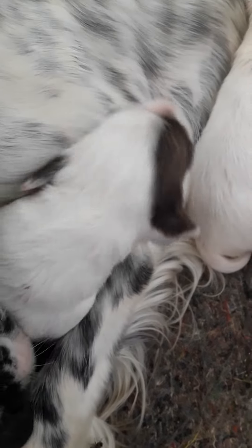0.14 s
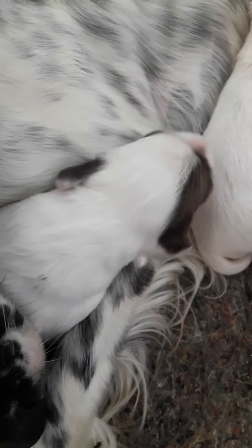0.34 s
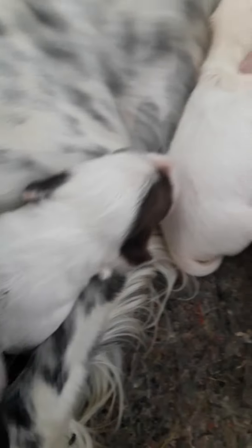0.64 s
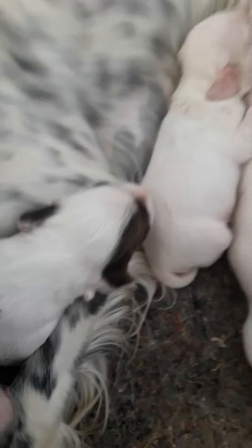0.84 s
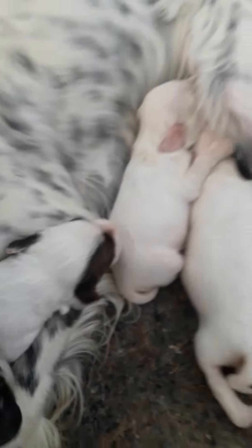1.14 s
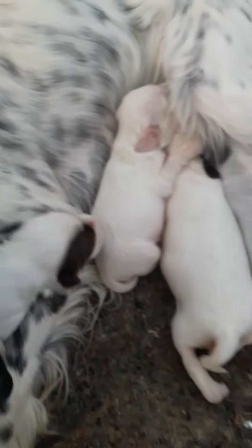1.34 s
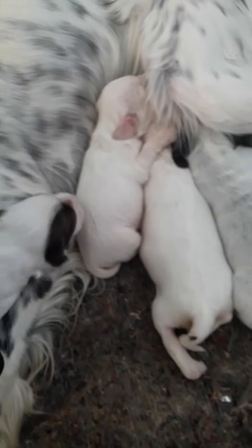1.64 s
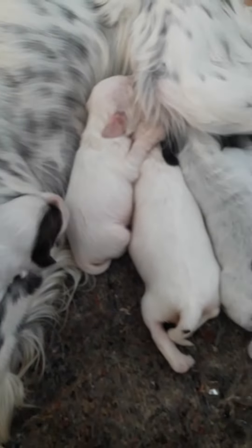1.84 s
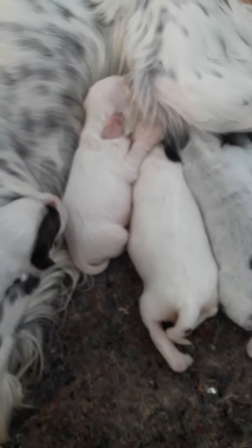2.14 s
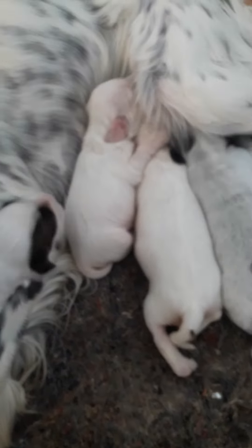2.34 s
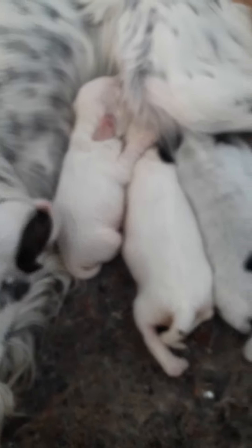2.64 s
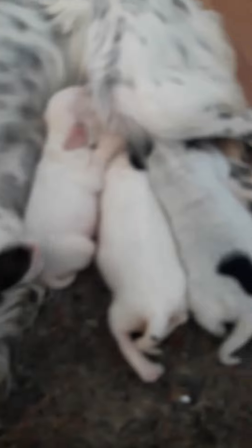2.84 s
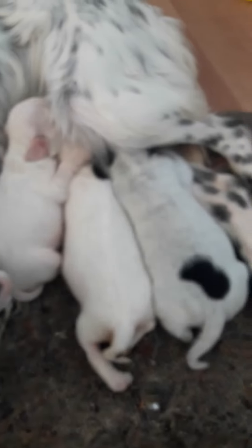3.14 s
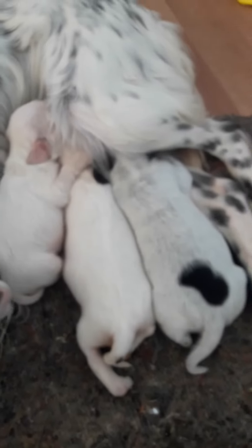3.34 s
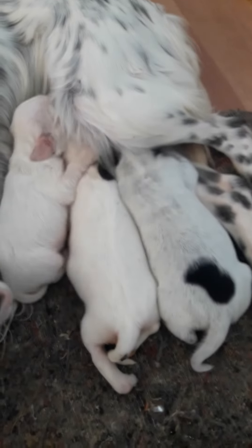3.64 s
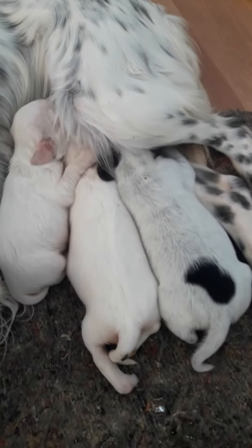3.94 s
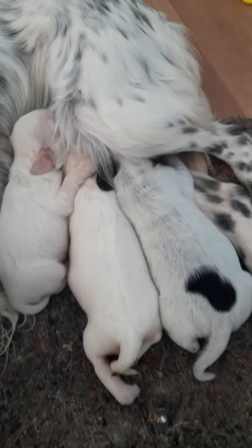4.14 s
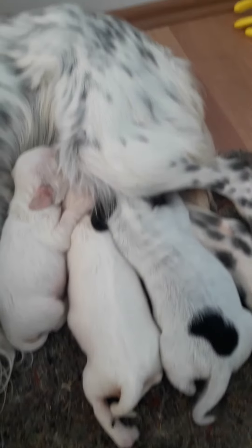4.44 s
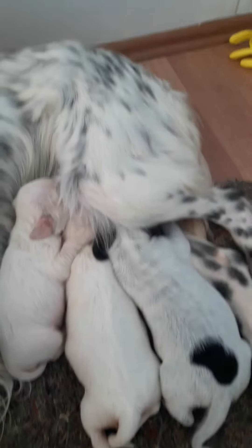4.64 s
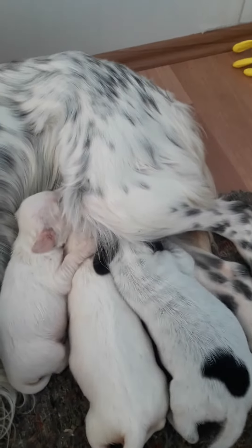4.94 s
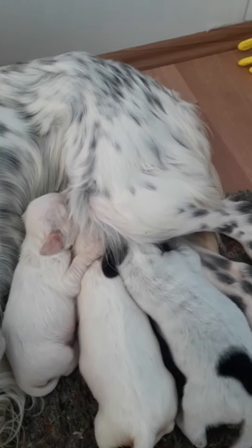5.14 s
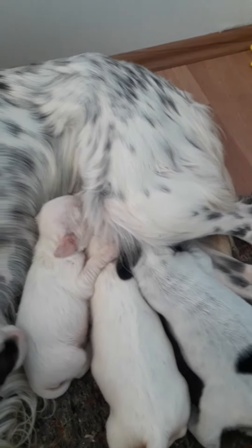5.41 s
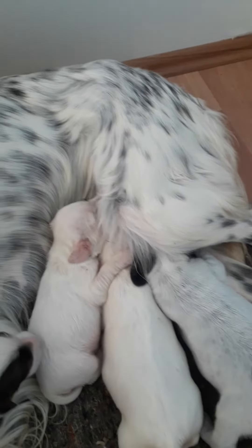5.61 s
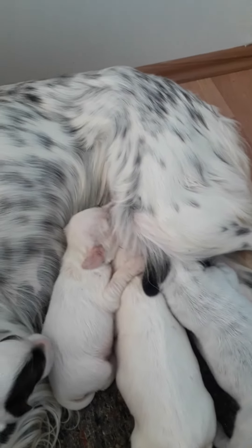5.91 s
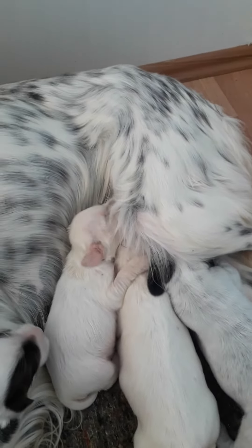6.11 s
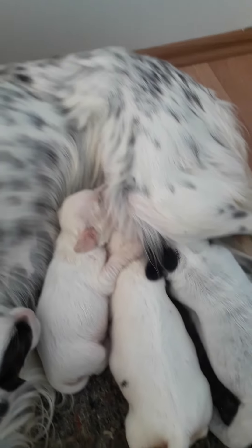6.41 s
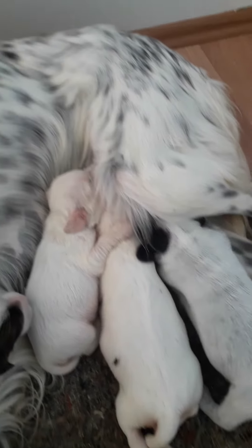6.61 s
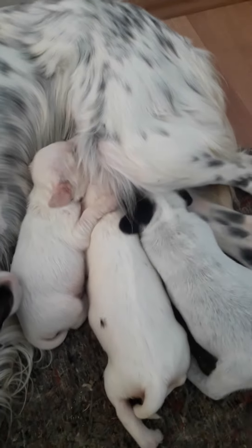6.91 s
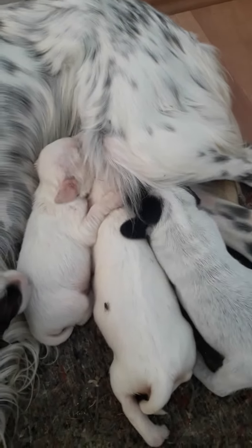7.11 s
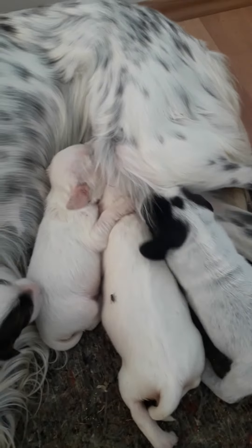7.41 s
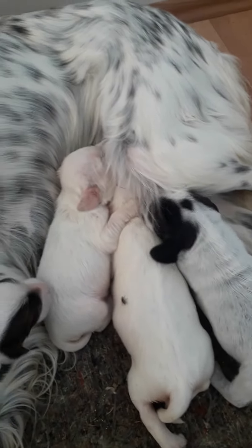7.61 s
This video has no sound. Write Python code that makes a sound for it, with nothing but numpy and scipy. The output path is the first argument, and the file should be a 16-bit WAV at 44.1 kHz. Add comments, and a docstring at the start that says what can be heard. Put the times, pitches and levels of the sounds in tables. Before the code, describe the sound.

Close up in a small room, nursing puppies let out short, nearly pure whines, with swallows, wet mouth clicks and thin sniffs in between. The squeaking stops a little past halfway, a dog snorts once, and the puppies grunt softly and keep suckling, with a cluster of smacks and gulps near the end. Light fur brushing, faint rustling on a rug and a quiet room hiss lie underneath.

```python
"""Newborn puppies nurse close by in a small room, squeaking in thin, nearly pure whines.
Slack vocal folds grunt, throats pop and hum as they gulp, and films of milk snap on their lips.
Air hisses through small noses, and one dog snorts with a flutter of the nostrils.
Fur brushes on fur now and then; under it all lie a faint rustle on the rug and a quiet room hiss."""
import sys
import numpy as np
from scipy import signal
from scipy.fft import rfft, irfft, next_fast_len
from scipy.io import wavfile
from scipy.ndimage import uniform_filter1d

SR = 44100
rng = np.random.default_rng(int(sys.argv[2]) if len(sys.argv) > 2 else 0)


def generate_wav(signal):
    """Clip the signal to [-1, 1] and save it as 16-bit WAV at the path in sys.argv[1]."""
    frames = np.transpose(np.atleast_2d(signal))
    scaled = np.clip(frames, -1, 1) * 32767
    pcm = np.round(scaled).astype(np.int16)
    wavfile.write(sys.argv[1], SR, pcm)


N = 342216

# throat colour of grunts and gulps: (frequency [Hz], gain [dB])
THROAT_EQ = [(60, -20), (170, 3.5), (350, 5.5), (550, -8), (850, -4.5), (1300, -7), (1700, -4.5), (2100, 0),
             (2600, -13), (4000, -53), (8000, -66.5)]
# nose resonances, also the colour of lip fizz and rug rustle: (frequency [Hz], gain [dB])
NOSE_EQ = [(200, -6.5), (900, 2), (1600, -4), (2300, 2.5), (3000, -4), (3800, 1.5), (4800, -1), (5800, 2.5),
           (8500, -26), (10500, -19), (15500, -22)]


def squeak(row, tune, swell_db=1.5, brighten_db=4.5, jitter=.005, flutter_db=2.6, rasp=.035):
    """A nearly pure whine: the folds chirp as they catch and let go; air whistles in the muzzle."""
    # colour of the upper harmonics and breath: (frequency [Hz], gain [dB])
    muzzle_eq = [(2500, -8), (3500, -12), (4500, -14), (5400, -25), (6100, 3), (6900, -7.5), (7700, -25),
                 (9400, -40), (10300, -17), (11500, -29.5), (12500, -27), (15500, -31.5)]
    # brief dips in the whine's fundamental, with its overtones swelling or fading:
    # (time [s], half width [s], fundamental change [dB], overtone change [dB])
    level_dips = [(.852, 0.018, -11.5, -15), (.98, 0.0089, -3.5, 0), (1.79, .012, -18.5, 5.5),
                  (1.91, 0.0097, -14, 2.5), (3.34, 0.022, -10, 1), (3.463, 0.024, -3, -5),
                  (4.288, 0.016, -3.5, 2.5), (4.482, 0.02, -3, 11.5)]
    s, length, rise, level_db, second_db, third_db, whistle_db, open_db, close_db, hoarse = row
    t, u = span(length)
    n = len(t)
    hz = np.interp(s + t, *np.transpose(tune))
    phase = 2 * np.pi * np.cumsum(hz * (1 + jitter * wander(n, 300))) / SR
    body_db, bright_db = sum(np.outer(db, bump(s + t, at, width)) for at, width, *db in level_dips)
    bright_db += brighten_db * (u - .5)
    body = gain_of(level_db + swell_db * (u - .5) + body_db) * held(t, rise, fall=.019)
    opening = bump(t, at=.0081, width=.0031)
    closing = bump(t, at=length - .013, width=.0086)
    chirps = gain_of(open_db) * opening + gain_of(close_db) * closing
    breath = (1 + np.cos(phase)) * above(rng.standard_normal(n), 2000)
    upper = gain_of(whistle_db - 8) * evened(coloured(breath, muzzle_eq))
    for k in range(2, 20):
        if k <= 3:
            partial_db = (second_db if k == 2 else third_db) + bright_db
        else:
            partial_db = whistle_db + read(muzzle_eq, k * hz) - 1
        partial_db += flutter_db * wander(n, 87) * (1 - 1 / k) ** 2
        upper -= gain_of(partial_db) * np.cos(k * phase + hoarse * wander(n, 110))
    upper *= held(t, rise=.017, fall=.0042)
    upper *= 1 - .87 * (opening + closing)  # overtones duck under the chirps
    tone = (body + chirps) * np.cos(phase) + upper
    tone *= 1 + rasp * wander(n, 460)  # cycles of uneven strength
    return s, faded(tone * gain_of(wander(n, 68)))  # 1 dB of shimmer


def grunt(s, length, rise, fall, level_db, start_hz, end_hz, open_hz, shut_after, alternation, rough,
          shut_hz=240, shutting_s=.0061, mouth_width_hz=620, leak=.18, jitter=.02, muffle_db=-.5):
    """Slack folds beat strong and weak by turns; the mouth resonance sinks as the lips close."""
    t, u = span(length)
    hz = end_hz + (start_hz - end_hz) * (1 - u) ** 1.623  # glides fastest at first
    shut = (1 + np.tanh((t - shut_after) / shutting_s)) / 2
    mouth_hz = open_hz + (shut_hz - open_hz) * shut
    slack = (1 + 4 * rough) * np.sqrt(400 / hz)  # slow beats are the most uneven
    phase = 2 * np.pi * np.cumsum(hz * (1 + jitter * slack * wander(len(t), 130))) / SR
    folds = sum((np.cos(k * phase) + alternation * np.cos((k - .5) * phase)) * (k * hz < 3000)
                for k in range(1, 36))
    puffs = (1 + np.cos(phase) / 2) * rng.standard_normal(len(t))
    drive = (1 - rough) * evened(coloured(folds, THROAT_EQ))
    drive += rough * evened(coloured(puffs, THROAT_EQ))
    voice = resonate(resonate(drive, mouth_hz, mouth_width_hz), mouth_hz, mouth_width_hz)
    voice = above(voice + leak * drive, max(180, .97 * hz.min()))
    voice /= np.sqrt(uniform_filter1d(voice ** 2, size=800) + 1e-12)  # flatten the level
    return s, voice * gain_of(level_db + muffle_db * shut) * held(t, rise, fall)


def gulp(s, pop_db, hum_db, hz, length, sag=.398, pop_hz=850, pop_t60=.012, pop_rise_s=.00094,
         rasp=.3, overtone=.35):
    """The throat pops open, then hums for a few cycles at a falling pitch."""
    side_modes = ring(pop_hz * 1.326, pop_t60) + ring(pop_hz * .772, pop_t60)
    pop = ring(pop_hz, pop_t60) + side_modes / 2
    t = np.arange(len(pop)) / SR
    sound = gain_of(pop_db) * pop * (1 - np.exp(-t / pop_rise_s))
    u = np.linspace(0, 1, min(int(length * SR), len(sound)))
    phase = 2 * np.pi * np.cumsum(hz * (1 - sag * u)) / SR
    hum = np.sin(phase) + overtone * np.sin(2 * phase) + overtone / 2 * np.sin(3 * phase)
    hum += rasp * evened(coloured(rng.standard_normal(len(u)), THROAT_EQ))
    add(sound, 0, gain_of(hum_db) * hum * np.sin(np.pi * u))
    return s, above(sound, 150)


def smack(s, peak_db, hz, t60, spit=.42, spit_t60=.021, dull_db=3.5):
    """A film of milk snaps and rings the small mouth cavity, with a brief fizz."""
    # mouth modes: (pitch [x cavity pitch], level [dB], ring time [x t60])
    modes = [(.89, 2, 0.86), (1.1, 6, 0.72), (1.63, -5, 2.16), (2.47, -7, 0.69), (2.95, -31.5, 0.37)]
    tilt_db = -dull_db * np.log2(t60 / .0065)  # slow smacks are dull, quick ones bright
    cavity = sum(gain_of(db + k * tilt_db) * ring(hz * ratio, t60 * longer) * (-1) ** k
                 for k, (ratio, db, longer) in enumerate(modes))
    t = np.arange(len(cavity)) / SR
    fizz = evened(coloured(rng.standard_normal(len(t)), NOSE_EQ)) * gain_of(-60 * t / spit_t60)
    sound = above(cavity + spit * fizz, .99 * hz)
    return s, gain_of(peak_db) * sound / abs(sound).max()


def snort(s=5.16, flaps=6, gap_s=.0047, slowing=.095, uneven=.097, rise_s=.0092, fade_db_per_s=478):
    """The nostrils flap, slow down and settle, ringing the nose over a rush of air and a low thump."""
    # nose modes: (frequency [Hz], level [dB], t60 [s])
    modes = [(225, -16, 0.053), (350, -18.5, 0.027), (808, -33.5, 0.046), (1500, -17, 0.027),
             (1700, -29, 0.024), (2710, -26, 0.043), (3570, -55, .03), (7400, -51, 0.035),
             (10300, -44.5, 0.047)]
    nose = sum(gain_of(db) * ring(hz, t60) for hz, db, t60 in modes)
    out = np.zeros(N)
    for k in range(flaps):
        after = gap_s * (k + slowing * k ** 2 + uneven * rng.standard_normal())
        attack = min(1, (k + .5) * gap_s / rise_s)
        add(out, s + after, attack * gain_of(1 - fade_db_per_s * after) * nose)
    add(out, s, air_rush())
    out = above(out, 214)
    add(out, s, gain_of(-45) * ring(hz=95, t60=.28))  # thump
    return out


def air_rush(hold_s=.48, flutter_db=1.25):
    """The snort's air surges, settles and runs out, in a hollow layer and a thin, high one."""
    # colour of the air: (frequency [Hz], gain [dB])
    rush_eq = [(100, -18), (300, -3.5), (650, -12), (1100, -11.5), (1450, 2), (2300, -1.5), (2800, 1),
               (3200, -4.5), (3800, 4.5), (5400, -1), (6600, -9.5), (7400, -7.5), (8500, -21.5),
               (10500, -11), (15500, -14)]
    t, _ = span(1)

    def flow(level_db, rise, surge_db, surge_s, fade_db_per_s):
        db = level_db + surge_db * np.exp(-t / surge_s) - fade_db_per_s * np.maximum(t - hold_s, 0)
        return np.minimum(t / rise, 1) * gain_of(db)

    hollow, thin = (coloured(noise, rush_eq) for noise in rng.standard_normal((2, len(t))))
    hollow = evened(signal.sosfilt(signal.butter(2, 4500, fs=SR, output="sos"), hollow))
    thin = evened(above(thin, 7000))
    hollow *= flow(-49, rise=.28, surge_db=27.5, surge_s=.1266, fade_db_per_s=41)
    thin *= flow(-51.5, rise=.17, surge_db=34, surge_s=.0477, fade_db_per_s=115)
    return (hollow + thin) * gain_of(flutter_db * wander(len(t), 80))


def sniff(s, length, rise, fall, level_db, start_hz, end_hz, width_hz=520, leak=.055, flutter_db=2):
    """Air hisses through a narrow nostril whose two resonances drift together."""
    t, u = span(length)
    hz = start_hz + (end_hz - start_hz) * u
    low_noise, high_noise, broadband = rng.standard_normal((3, len(t)))
    lower = resonate(low_noise, hz, width_hz * np.mean(hz) / 3000)
    upper = gain_of(-7) * resonate(high_noise, 1.1 * hz, width_hz)
    air = evened(coloured(lower + upper + leak * broadband, NOSE_EQ))
    return s, air * held(t, rise, fall) * gain_of(level_db + flutter_db * wander(len(t), 78))


def fur_brush(s, length, level_db, flicks_per_s=2500):
    """Hairs flick past each other in one stroke: a soft, high crackle."""
    # colour of the fur: (frequency [Hz], gain [dB])
    fur_eq = [(1500, -26), (4000, 3), (6000, -4), (8500, -22.5), (10500, -7), (15500, -1)]
    t, u = span(length)
    flicks = (rng.random(len(t)) < flicks_per_s / SR) * rng.standard_normal(len(t))
    return s, gain_of(level_db) * np.sin(np.pi * u) * evened(coloured(flicks, fur_eq))


def rug_rustle(ticks_per_s=90, level_db=-73):
    """Fur and paws brush the rug in tiny scattered ticks."""
    ticks = rng.random(N) < ticks_per_s / SR
    strength = gain_of(3.5 * np.minimum(rng.exponential(1, N), 2.5))
    grain = rng.standard_normal(600) * signal.windows.hann(600)
    rustle = signal.oaconvolve(ticks * strength, grain)[:N]
    return gain_of(level_db) * evened(coloured(rustle, NOSE_EQ))


def room_hiss(level_db=-59, swell_db=1.25):
    """A gently wavering bed of hiss, almost the same in both ears."""
    # colour of the hiss: (frequency [Hz], gain [dB])
    hiss_eq = [(20, -34.5), (55, 5.5), (110, 7.5), (170, 0), (400, -4.5), (1500, -9), (2500, -10),
               (4200, -4.5), (5400, 2.5), (6500, -11.5), (7600, -23), (8800, -30), (10500, -17.5),
               (15500, -12.5)]
    # stereo image: (frequency [Hz], left-right likeness [0-1])
    likeness = [(50, 0.96), (4000, 0.95), (8000, 0.99), (14000, 0.51)]
    middle, side = (coloured(rng.standard_normal(N), hiss_eq) for _ in range(2))
    side_eq = [(hz, 10 * np.log10(max(1 - same, 1e-3) / (1 + same))) for hz, same in likeness]
    side = coloured(side, side_eq) / np.std(middle)
    return gain_of(level_db + swell_db * wander(N, 5.4)) * (evened(middle) + np.array([side, -side]))


def room(x, wet_db, overtones_db=0, width=.0067, echoes_per_s=2500):
    """A small room: sparse reflections of random sign, each band dying at its own speed."""
    # reverb decay: (frequency [Hz], t60 [s])
    decay = [(200, 0.3), (800, 0.32), (2000, 0.44), (5000, 0.2), (12000, 0.022)]
    size = SR // 2
    taps = rng.choice([-1, 1], (2, size)) * (rng.random((2, size)) < echoes_per_s / SR)
    taps *= np.arange(size) > SR // 200  # 5 ms pre-delay
    hz, t, bands = signal.stft(taps, SR, nperseg=256)
    tail = signal.istft(bands * gain_of(-60 * t / read(decay, hz)[:, None]), SR, nperseg=256)[1]
    send = coloured(x, [(1000, .0035), (1400, overtones_db)])
    middle, side = signal.fftconvolve(send[None], tail / np.linalg.norm(tail[0]), axes=1)[:, :N]
    return x + gain_of(wet_db) * (middle + width * np.array([side, -side]))


def gain_of(db):
    """Decibels to amplitude."""
    return 10 ** (np.asarray(db) / 20)


def evened(x):
    """Scales to rms 1."""
    return x / np.sqrt(np.mean(x ** 2) + 1e-20)


def read(points, hz):
    """Reads a table on a log-frequency axis."""
    f, value = np.transpose(points)
    return np.interp(np.log(hz + 1), np.log(f + 1), value)


def add(mix, s, sound):
    """Adds a sound into the mix at time s."""
    part = mix[round(s * SR):][:len(sound)]
    part += sound[:len(part)]


def coloured(x, points):
    """Applies an EQ curve in dB."""
    size = next_fast_len(len(x) + 2048)
    gain = gain_of(read(points, np.fft.rfftfreq(size, 1 / SR)))
    return irfft(rfft(x, size) * gain, size)[:len(x)]


def above(x, hz):
    """A steep high-pass."""
    return signal.sosfilt(signal.butter(4, min(hz, SR / 4), "high", fs=SR, output="sos"), x)


def wander(size, hz):
    """Smooth random motion of rms about 1, up to about hz."""
    whole = next_fast_len(size + SR // 8)
    f = np.fft.rfftfreq(whole, 1 / SR)
    return evened(irfft(rfft(rng.standard_normal(whole)) * np.exp(-(f / hz) ** 2)))[:size]


def resonate(x, hz, width_hz):
    """A resonance of gain 1 that follows the curve hz."""
    turn = np.exp(2j * np.pi * np.cumsum(hz) / SR)
    pole = np.exp(-np.pi * width_hz / SR)
    return 2 * (turn * signal.lfilter([1 - pole], [1, -pole], x / turn)).real


def ring(hz, t60, size=5000):
    """One dying mode."""
    t = np.arange(size) / SR
    return np.sin(2 * np.pi * hz * t) * gain_of(-60 * t / t60) * (hz < SR / 2)


def span(length):
    """Time t since the start of a sound, and the share u of it that has passed."""
    t = np.arange(max(int(length * SR), 64)) / SR
    return t, t / t[-1]


def held(t, rise, fall):
    """Attack, hold and release."""
    return np.clip(t / rise, 0, 1) * np.clip((t[-1] - t) / fall, 0, 1)


def bump(t, at, width):
    """A smooth bump of height 1."""
    return np.exp(-((t - at) / width) ** 2)


def faded(x, size=260):
    """Softens both ends."""
    return x * signal.windows.tukey(len(x), min(1, size / len(x)))


def scene():
    """Squeaks, throat sounds and small noises, each group with its own reverb, over the hiss."""
    # whines: (time [s], length [s], rise [s], fundamental [dB], octave [dB], third harmonic [dB],
    # whistle [dB], opening chirp [dB], closing chirp [dB], hoarseness [rad])
    squeaks = [(.629, 0.0905, 0.038, -32.5, -49, -66, -58.5, -70, -68, .1),
               (.759, 0.2765, 0.019, -27, -35, -60, -46.5, -31.5, -28, 0.22),
               (1.689, .247, 0.059, -31.5, -35, -47, -54, -37.5, -24, .5),
               (3.307, 0.25, 0.078, -30.5, -43, -59, -59, -33, -32.5, 0.76),
               (4.244, 0.299, 0.021, -25, -35.5, -61, -56, -28.5, -21, 0.14)]
    # one pitch curve per squeak: (time [s], pitch [Hz])
    tunes = [
        [(0.635, 1063), (0.71, 1044)],
        [(0.765, 906), (0.773, 874), (0.809, 865), (0.841, 955), (0.847, 992), (0.861, 992), (0.903, 888),
         (0.971, 847), (1.035, 884)],
        [(1.696, 874), (1.708, 713), (1.728, 664), (1.776, 658.4), (1.788, 683.5), (1.816, 655.7),
         (1.904, 660.3), (1.914, 759), (1.926, 888)],
        [(3.312, 855), (3.32, 824), (3.328, 771), (3.342, 761), (3.39, 883), (3.478, 813), (3.526, 890),
         (3.544, 909)],
        [(4.25, 931), (4.272, 835), (4.29, 838), (4.33, 886), (4.414, 844), (4.498, 837), (4.51, 861),
         (4.53, 977), (4.545, 1020)],
    ]
    # throaty grunts: (time [s], length [s], rise [s], fall [s], level [dB], start pitch [Hz],
    # end pitch [Hz], open mouth [Hz], lips close after [s], alternation [0-1], roughness [0-1])
    grunts = [(2.463, .082, 0.013, 0.013, -38, 517, 371, 895, 0.052, 0.24, 0.12),
              (4.054, .205, 0.032, 0.077, -41, 79.6, 70.1, 704, 0.033, 0.63, 0.54),
              (4.946, 0.103, 0.041, 0.016, -37, 389.6, 390, 956, 0.08, 0.38, 0.12),
              (5.542, .12, 0.039, 0.031, -32, 425.6, 338, 1267, 0.0926, 0.08, 0.34),
              (6.758, 0.058, 0.015, 0.023, -45, 328, 302, 1110, .06, 0.5, 0.73)]
    # swallows: (time [s], pop [dB], hum [dB], hum pitch [Hz], hum length [s])
    gulps = [(0.296, -45, -56, 395, 0.014), (0.3103, -30, -38.5, 394, 0.0163),
             (0.761, -25, -38.5, 426, 0.011), (1.17, -25, -40.5, 393.5, 0.035),
             (3.154, -65, -48.5, 363, 0.033), (3.257, -63, -49.5, 365, 0.0084),
             (3.972, -34, -63, 405, 0.0066), (5.81, -34, -63, 404, 0.031), (6.276, -72, -46.5, 352, 0.0095),
             (6.7976, -27, -37, 498, 0.0072), (6.9053, -21.5, -36, 359, 0.02),
             (7.08, -28.5, -43, 487, 0.033), (7.467, -68, -48, 350, 0.029)]
    # wet lip smacks: (time [s], peak [dB], mouth cavity [Hz], t60 [s])
    smacks = [(0.719, -28.5, 4920, 0.058), (0.7215, -20.5, 2020, 0.016), (2.832, -33.5, 2260, 0.018),
              (3.901, -34, 2192, 0.041), (3.9842, -31, 2400, 0.0072), (4.598, -34, 2270, 0.026),
              (4.899, -36, 3950, 0.026), (4.928, -33.5, 2260, 0.0044), (5.609, -27.5, 3070, 0.022),
              (5.644, -29, 3190, 0.03), (5.842, -35, 2240, 0.021), (6.358, -39, 1840, 0.022),
              (6.365, -37, 1960, 0.032), (6.607, -30.5, 5950, 0.0029), (6.6404, -32, 4450, 0.004),
              (6.6754, -21, 2080, 0.0073), (6.6775, -29, 3480, 0.026), (6.686, -43, 13000, .01),
              (6.7165, -33.5, 3970, 0.0066), (6.8, -38.5, 3190, 0.033), (6.8603, -44.5, 3500, 0.018),
              (7.494, -39, 5360, 0.0055)]
    # thin nose hisses: (time [s], length [s], rise [s], fall [s], level [dB],
    # start resonance [Hz], end resonance [Hz])
    sniffs = [(0.389, .19, 0.061, .06, -61.5, 4230, 2960), (.722, 0.063, .004, 0.033, -47.5, 4500, 4450),
              (1.0, 0.077, .02, .03, -64, 4330, 4200), (1.322, 0.93, 0.05, 0.62, -58.5, 3310, 3080),
              (1.357, 0.75, 0.12, 0.14, -58.5, 12300, 11400), (2.21, .115, 0.035, 0.035, -49.5, 2610, 2740),
              (2.455, 0.71, 0.15, 0.27, -60.5, 2400, 2400), (2.452, 0.57, 0.17, 0.13, -62.5, 3700, 3670),
              (4.039, .14, 0.029, 0.11, -62.5, 2200, 2920), (4.421, 0.27, .12, .03, -61.5, 4260, 3920),
              (6.109, 0.089, 0.021, 0.036, -53.5, 1360, 2200), (6.327, .13, .06, 0.02, -64, 1970, 1700),
              (6.771, .78, 0.13, 0.47, -56, 1220, 1160)]
    # fur sliding on fur: (time [s], length [s], level [dB])
    brushes = [(.29, 0.088, -60), (2.2, .17, -60), (3.971, 1, -62), (4.942, 0.22, -57), (6.108, 0.087, -55),
               (6.598, 0.17, -57), (6.896, 0.16, -63)]
    whines, throats, noises = np.zeros((3, N))
    for row, tune in zip(squeaks, tunes):
        add(whines, *squeak(row, tune))
    for bus, source, cues in [(throats, grunt, grunts), (throats, gulp, gulps), (noises, smack, smacks),
                              (noises, sniff, sniffs), (noises, fur_brush, brushes)]:
        for row in cues:
            add(bus, *source(*row))
    whines = room(whines, wet_db=-16.5, overtones_db=2.5)  # overtones wetter than the fundamentals
    throats = room(throats, wet_db=-9)
    noises = room(noises + snort() + rug_rustle(), wet_db=-12.5)
    return whines + throats + noises + room_hiss()


def record(dry):
    """A steep low-pass takes off the very top of the treble."""
    lowpass = signal.firwin(511, cutoff=15850, window=("kaiser", 9), fs=SR)
    return signal.oaconvolve(dry, lowpass[None], "same")


dry = scene()
out = record(dry)
generate_wav(out)
```